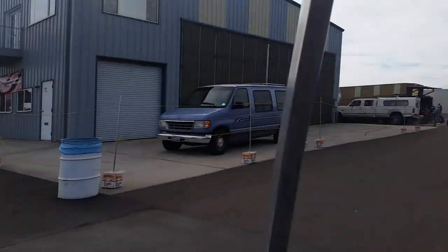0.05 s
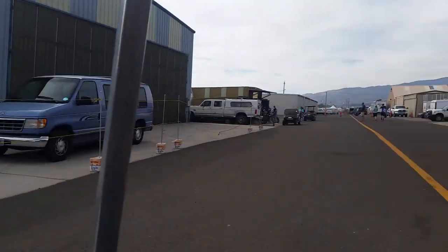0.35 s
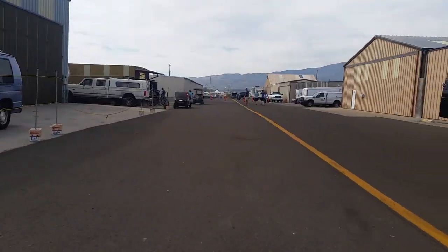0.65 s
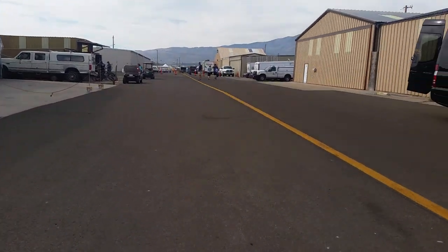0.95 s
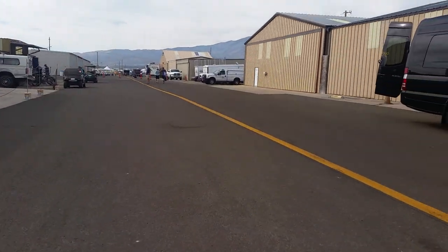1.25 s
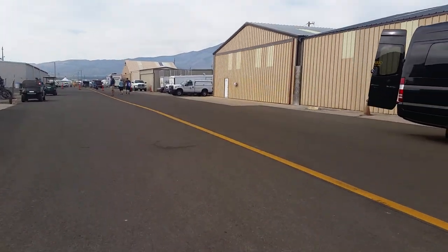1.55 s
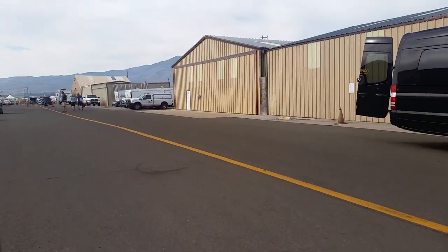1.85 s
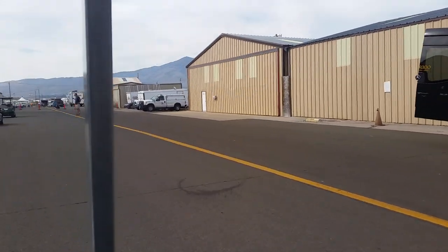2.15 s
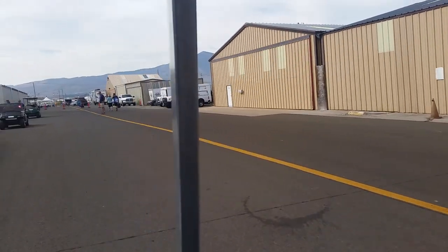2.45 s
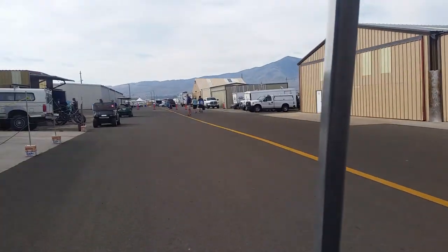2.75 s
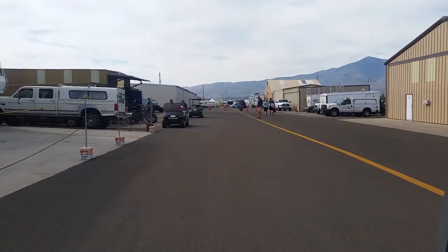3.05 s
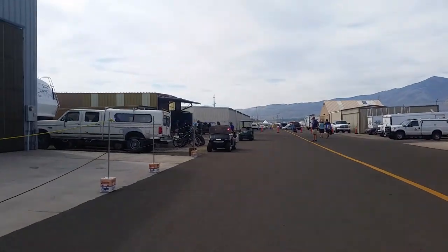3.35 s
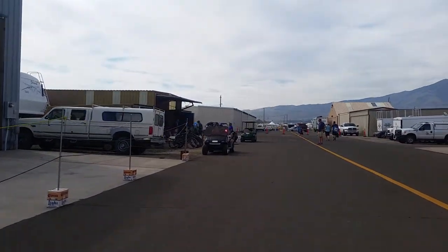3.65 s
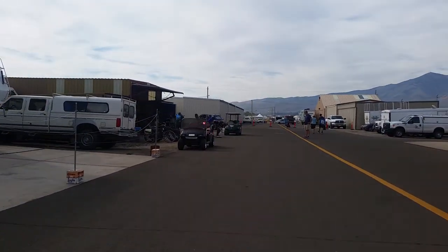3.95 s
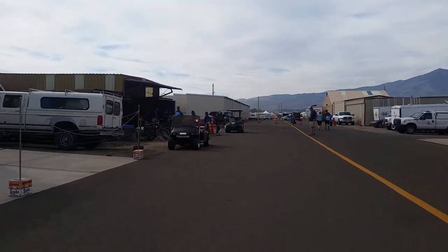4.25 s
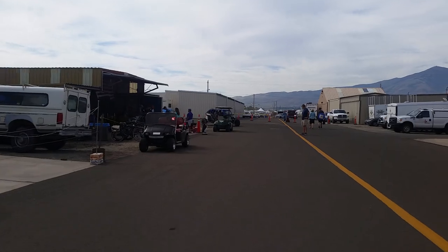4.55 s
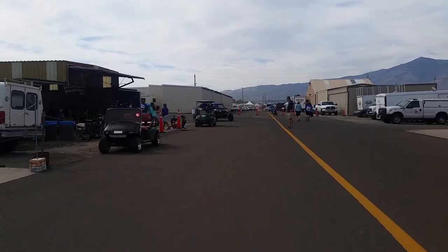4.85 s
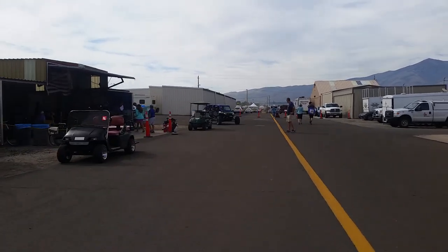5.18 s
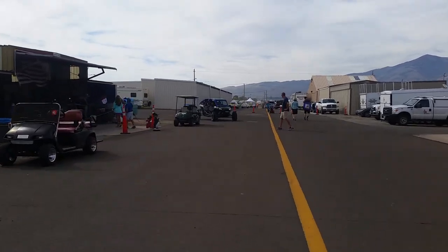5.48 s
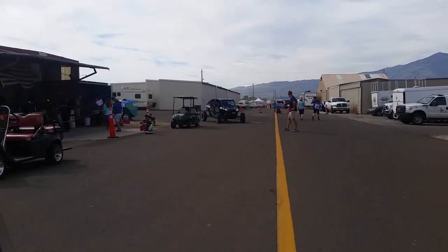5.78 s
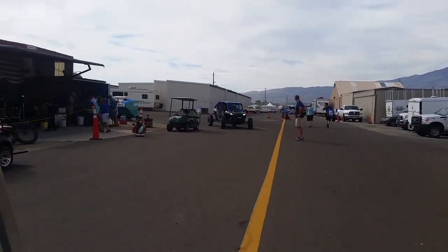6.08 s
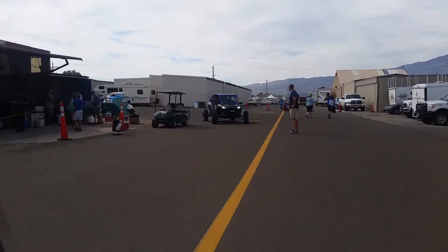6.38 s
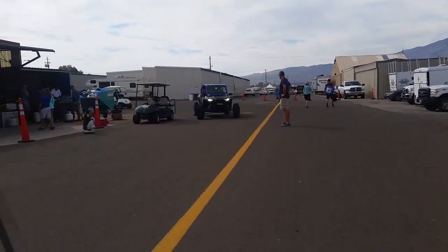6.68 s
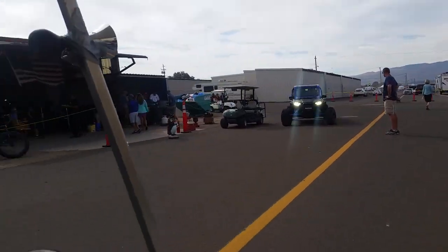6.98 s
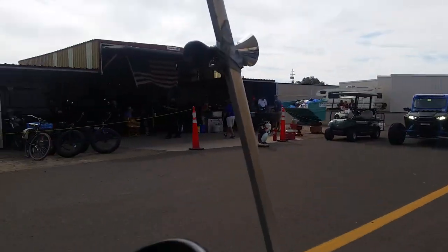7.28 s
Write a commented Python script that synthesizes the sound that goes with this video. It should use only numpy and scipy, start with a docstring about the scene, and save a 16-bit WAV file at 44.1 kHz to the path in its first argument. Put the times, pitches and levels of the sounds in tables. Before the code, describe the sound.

A petrol golf cart rolls along open pavement, heard from its seat. Its low drone beats against a second cart's engine over steady tyre roar, gear whine and buzzing, rattling fittings. Another engine revs briefly at the start, and a few bumps bring thuds and small squeaks. Wind buffets the microphone now and then. Near the end the whine grows louder and an oncoming buggy adds a low hum.

```python
"""On airfield pavement, heard from the open seat of a petrol golf cart while a second cart keeps pace.
Two single-cylinder engines sound harmonics of their firing rates, which beat against each other over
the boom of the body and the roar of the tyres. Meshing gears whine, grit excites the modes of the roof,
the frame squeaks and fittings rattle with each firing. A third engine revs at the start, and an
oncoming buggy adds its hum near the end."""
import sys
import numpy as np
from scipy import signal
from scipy.io import wavfile
from scipy.ndimage import uniform_filter1d, minimum_filter1d

SR = 44100
rng = np.random.default_rng(int(sys.argv[2]) if len(sys.argv) > 2 else 0)


def dump_mix(stems):
    """Bounce the given channels to the path in sys.argv[1] as a 16-bit WAV at rate SR."""
    frames = np.atleast_2d(stems).T  # one column per channel
    limited = np.clip(frames, -1, 1)  # hard clip at full scale
    pcm = np.round(limited * 32767).astype(np.int16)
    wavfile.write(sys.argv[1], SR, pcm)


N = 327222
TIME = np.arange(N) / SR


def from_db(db):
    """Amplitude ratio: a factor of ten for every 20 dB."""
    return 10 ** (np.asarray(db) / 20)

def rms_one(x):
    """Normalisation to unit mean power."""
    return x / np.sqrt(np.mean(x ** 2) + 1e-20)

def in_time(rows):
    """Linear interpolation in time, one curve for each column after the first."""
    times, *columns = np.transpose(rows)
    return [np.interp(TIME, times, column) for column in columns]

def at_hz(points, hz):
    """Interpolation on a logarithmic frequency axis."""
    frequencies, values = np.transpose(points)
    return np.interp(np.log(hz), np.log(frequencies), values)

def swell(t, half_s):
    """Gaussian envelope: 1 at time t, 1/e a half-length to either side."""
    return np.exp(-((TIME - t) / half_s) ** 2)

def turns(hz):
    """Phase in cycles is the integral of frequency, here from a random start."""
    return np.cumsum(hz) / SR + rng.random()

def drift(corner_hz):
    """Random modulation of rms 1: white noise smoothed by two equal poles."""
    step, settling = 40, 2000
    pole = np.exp(-2 * np.pi * corner_hz * step / SR)
    white = rng.standard_normal(N // step + settling + 2)
    slow = signal.lfilter([1], [1, -2 * pole, pole * pole], white)[settling:]
    return np.interp(np.arange(N) / step, np.arange(len(slow)), rms_one(slow))

def low_pass(x, hz):
    """Fourth-order roll-off, 24 dB per octave."""
    return signal.sosfilt(signal.butter(4, hz, fs=SR, output="sos"), x)

def resonate(x, modes):
    """Modal superposition: damped resonators in parallel, alternating in sign."""
    out = 0
    for k, (hz, width, db) in enumerate(modes):
        r = np.exp(-np.pi * width / SR)
        poles = [1, -2 * r * np.cos(2 * np.pi * hz / SR), r * r]
        mode = (1 - r * r) / 2 * signal.lfilter([1, 0, -1], poles, x + 1e-18)
        out += (-1) ** k * from_db(db) * mode
    return out

def wavering_tone(hz, wander, rough):
    """A sinusoid of rms 1 under random frequency and amplitude modulation."""
    amplitude = 1 + rough * drift(2.1)
    cycle = turns(hz * (1 + wander * drift(12.6)))
    return rms_one(amplitude * np.sin(2 * np.pi * cycle))

def narrow_noise(hz, spread_hz):
    """Narrow-band noise: two carriers in quadrature, each randomly modulated."""
    angle = 2 * np.pi * turns(hz)
    return drift(spread_hz) * np.cos(angle) + drift(spread_hz) * np.sin(angle)

def harmonics(cycle, orders, rough):
    """Periodic firing gives a harmonic series; unequal strokes modulate phase and amplitude."""
    out = 0
    for order, db in orders:
        angle = 2 * np.pi * (order * cycle + rng.random()) + rough * drift(4.4)
        out += np.sqrt(2) * from_db(db) * (1 + rough * drift(8.6)) * np.sin(angle)
    return out

def throb(cycle, firing, crank):
    """Amplitude modulation at the firing rate and at the crank rate, which is twice as high."""
    return rms_one(np.exp(firing * np.cos(2 * np.pi * cycle) + crank * np.cos(4 * np.pi * cycle)))

def impacts(per_s, spread_db):
    """Shot noise: two independent trains of impulses, random in time, size and sign."""
    struck = rng.random((2, N)) < per_s / SR
    return struck * from_db(spread_db * rng.random((2, N))) * rng.choice([-1, 1], (2, N))

def pan(x, lean_db):
    """A level difference places a sound to the left (positive) or right."""
    return x * from_db(np.array([[.5], [-.5]]) * lean_db)

def left_first(x, lag_s):
    """A path difference delays sound from the left on its way to the right channel."""
    return np.array([x, np.interp(np.arange(N) - lag_s * SR, np.arange(N), x)])

# Likeness of left and right in the noise field: f/Hz, correlation coefficient
CORRELATION = [(60, 0.75), (85, 0.43), (120, 0.64), (170, 1), (240, 0.58), (330, 0.62), (470, 0.73),
               (660, 0.7), (930, 0.29), (1310, -0.21), (1850, -0.36), (2600, 0.059)]
# Balance of the noise field: f/Hz, left minus right/dB
NOISE_LEAN = [(60, 9), (130, -1), (260, 4.5), (460, 0), (820, -1.5), (1400, -5.5), (2000, -4), (4000, -2.5),
              (6500, -5.5), (9000, 4), (12000, 7.5), (15000, -6.5)]
def at_ears(mid, side, hz):
    """Partial coherence: the sum and difference of independent signals form a stereo pair."""
    alike = at_hz(CORRELATION, hz)
    pair = np.sqrt(1 + alike) * mid + np.sqrt(1 - alike) * side * [[1], [-1]]
    return pan(pair, at_hz(NOISE_LEAN, hz))

def banded_noise(spectrum, flicker_db):
    """Broadband noise as a sum of roughly third-octave bands, each fluctuating independently."""
    bottom, top = spectrum[0][0], spectrum[-1][0]
    edges = np.geomspace(bottom, top, round(3 * np.log2(top / bottom)) + 2)
    out, white = 0, rng.standard_normal((2, 2, N))
    for k, (low, high) in enumerate(zip(edges, edges[1:])):
        band = signal.butter(2, [low, high], "band", fs=SR, output="sos")
        mid, side = signal.sosfilt(band, white[k % 2])
        hz = np.sqrt(low * high)
        out += from_db(at_hz(spectrum, hz) + flicker_db * drift(8.1)) * at_ears(mid, side, hz)
    out = low_pass(out, 1.15 * top)
    return out / np.std(out.mean(axis=0))

# Rush of air and tyres: t/s, relative hiss level/dB, relative level of the highest treble/dB
RUSH = [(0.0, -61, -68), (0.55, -63.5, -67), (0.92, -61, -64), (1.15, -64.5, -69.5), (1.56, -65, -69.5),
        (1.68, -68.5, -73), (1.95, -68.5, -76), (2.15, -70, -74.5), (2.3, -65, -72.5), (2.5, -68.5, -72.5),
        (2.8, -62, -66.5), (3.6, -60.5, -69), (3.8, -62.5, -73.5), (4.6, -64.5, -74.5),
        (5.15, -61.5, -71.5), (5.3, -64, -76), (5.92, -61, -75.5), (6.08, -71, -81), (6.55, -65, -77.5),
        (6.72, -61.5, -72), (7.05, -65, -74.5), (7.42, -60, -70)]
def ride_gain(db, rush_share=0, db_per_s=0):
    """Common modulation: a mean level, a share of the swing of the rush and a linear trend."""
    rush_db, _ = in_time(RUSH)
    return from_db(db + rush_share * (rush_db - rush_db.mean()) + db_per_s * (TIME - TIME.mean()))

# Spectra of the air's hiss and of its highest treble: f/Hz, relative density/dB
HISS_SPECTRUM = [(4600, 1.5), (5500, -2), (6400, -1.5), (7300, -5.5), (8200, -25)]
TREBLE_SPECTRUM = [(8000, -6.5), (9300, -8), (10500, -2), (12000, 3), (14000, -9), (16000, -1)]
def air_hiss(cycle):
    """Flow noise past the cab, modulated as the engine shakes it."""
    _, treble_db = in_time(RUSH)
    hiss = ride_gain(-67, rush_share=0.96, db_per_s=-0.45) * banded_noise(HISS_SPECTRUM, flicker_db=2)
    treble = from_db(treble_db + 2.5) * banded_noise(TREBLE_SPECTRUM, flicker_db=1)
    return (hiss + treble) * throb(cycle, firing=0.07, crank=0.09)

# Gusts on the left microphone: t/s, half-length/s, level/dB
GUSTS = [(1.258, 0.091, -18), (2.47, 0.067, -13.5), (2.66, 0.04, -16), (5.085, 0.025, -14.5),
         (6.18, 0.16, -18.5), (6.54, 0.022, -36), (6.906, 0.36, -31.5)]
# Cavity modes of its port: f/Hz, bandwidth/Hz, gain/dB
PORT_MODES = [(223, 200, 2), (367, 82, 8.5)]
def wind():
    """Turbulence buffets each microphone separately; gusts excite cavity resonance in the left port."""
    force = sum(from_db(db) * swell(t, half) for t, half, db in GUSTS)
    flutter = force * rms_one(low_pass(resonate(rng.standard_normal(N), PORT_MODES), hz=630))
    pressure = ride_gain(-36.5, db_per_s=-1.2) * from_db(2 * drift(2))
    buffet = pressure * rms_one(low_pass(rng.standard_normal((2, N)), hz=55))
    return flutter * [[1], [0]] + buffet

# Rough patches of pavement: t/s, half-length/s, thud level/dB, change in tyre and rattle level/dB
JOLTS = [(.3, .07, -28, 0), (0.953, 0.039, -20, 0.5), (1.008, 0.022, -24, 2.5), (1.1, 0.036, -19, -1),
         (1.261, 0.039, -15, 3), (1.56, .025, -38, 1.5), (2.79, 0.027, -43, 1), (3.45, 0.16, -41, 0.4),
         (3.847, 0.36, -29, 0.5), (5.047, 0.14, -38, 2.8)]
def jolt_gain():
    """Transient excitation: jolts briefly change the level of tyres, grit and fittings."""
    return from_db(sum(db * swell(t, half) for t, half, _, db in JOLTS))

# Spectrum of the chassis vibration: f/Hz, relative density/dB
RUMBLE_SPECTRUM = [(20, -17), (30, -6.5), (45, -4.5), (65, 0), (85, -6), (130, -20)]
def chassis_rumble():
    """Structure-borne road noise: steady shaking and the thuds of jolts add in power."""
    thud = sum(from_db(db) * swell(t, half) for t, half, db, _ in JOLTS)
    steady = ride_gain(-33.5, db_per_s=-0.68)
    return np.hypot(steady, thud) * banded_noise(RUMBLE_SPECTRUM, flicker_db=3.5)

# Spectra of the tyres' roar and the tread's hiss: f/Hz, relative density/dB
ROAR_SPECTRUM = [(150, -21.5), (250, 3.5), (320, -0.5), (390, -0.5), (500, -1), (620, -3.5), (760, -2),
                 (920, -4.5), (1150, -19), (1800, -40)]
TREAD_SPECTRUM = [(750, -24), (1050, 6), (1250, 1), (1650, 2.5), (2000, -18), (2600, -33)]
def tyres(cycle):
    """Rolling contact radiates broadband noise; its upper band throbs with the engine."""
    roar = ride_gain(-21.5, rush_share=0.27, db_per_s=0.13) * banded_noise(ROAR_SPECTRUM, -0.62)
    tread = ride_gain(-33, rush_share=0.52) * banded_noise(TREAD_SPECTRUM, flicker_db=1.36)
    return jolt_gain() * (roar + tread * throb(cycle, firing=0.081, crank=0.04))

# Modes of roof and windscreen: f/Hz, bandwidth/Hz, gain/dB
ROOF_MODES = [(370, 55, -3), (497.5, 25, 2.5), (563.5, 23, 4.5), (710, 20, 4.5), (740.5, 49, 0.5),
              (942, 150, -9.5), (1289, 59, -7.5), (1383, 30, -11), (1640, 24, -5.5), (1719, 25, -6),
              (1870, 35, -10), (1990, 77, -13.5)]
def roof():
    """Impact excitation: grit under the tyres rings modes that wax and wane as the panels flex."""
    grit = impacts(per_s=400, spread_db=9.5)
    ringing = 0
    for k, (hz, width, db) in enumerate(ROOF_MODES):
        mid, side = resonate(grit, [(hz, width, db)])
        ringing += (-1) ** k * from_db(drift(1.3)) * at_ears(mid, side, hz)
    ringing = low_pass(ringing, hz=2600)
    return jolt_gain() * ride_gain(-30, rush_share=0.23) * ringing / np.std(ringing.mean(axis=0))

# Chatter of the fittings: t/s, level/dB
CHATTER = [(0, -36), (.35, -36.5), (.6, -36), (.95, -37), (1.12, -38.5), (1.55, -38.5), (1.75, -39),
           (2.45, -39), (2.78, -35.5), (3.6, -37), (4.1, -36.5), (4.65, -36.5), (5.1, -37.5), (5.3, -37),
           (5.93, -37), (6.05, -40), (6.35, -39), (6.65, -38), (7.42, -37.5)]
# Spectrum of their buzz: f/Hz, relative density/dB
BUZZ_SPECTRUM = [(1400, -3), (1850, 6), (2300, 3), (2700, -4.5), (3200, -7.5), (3750, -7.5), (4500, -27),
                 (5300, -40.5)]
# Their modes: f/Hz, bandwidth/Hz, gain/dB
FITTING_MODES = [(1900, 500, -2), (2900, 900, 0), (3700, 900, 0), (4600, 900, -2)]
def rattles(cycle):
    """Intermittent contact: loose fittings buzz and strike, most often just as the engine fires."""
    buzz = banded_noise(BUZZ_SPECTRUM, flicker_db=0.96) * throb(cycle, firing=0.096, crank=0.047)
    contacts = impacts(per_s=130 * (1 + np.cos(2 * np.pi * cycle)), spread_db=1.5)
    ringing = rms_one(low_pass(resonate(contacts, FITTING_MODES), hz=4500))
    shaking = from_db(in_time(CHATTER)[0]) * jolt_gain()
    return shaking * (buzz + from_db(-18.5) * pan(ringing, lean_db=-2))

# Single strikes of a fitting: t/s, impulse level/dB
TICKS = [(1.3286, -12), (2.046, -1.5), (3.6184, -13), (5.153, -5)]
def ticks():
    """Impulse response: a bump strikes a fitting once, and its heavily damped modes die quickly."""
    strikes = np.zeros(N)
    for t, db in TICKS:
        strikes[round(t * SR)] = from_db(db)
    ringing = resonate(strikes, FITTING_MODES[1:])
    return pan(low_pass(low_pass(ringing, hz=4200), hz=4200), lean_db=-14)

# Chafing of loose parts: t/s, half-length/s, lower f/Hz, upper f/Hz, level/dB
SCUFFS = [(.338, .028, 2150, 2600, -35), (.93, .006, 5300, 6700, -55), (1.009, 0.016, 1350, 2750, -27.5),
          (1.18, .008, 2520, 3500, -47), (3.62, .025, 5000, 9000, -61), (5.186, .012, 4000, 6800, -53)]
def scuffs():
    """Sliding friction: on bumps, loose parts give short bursts of band-limited noise."""
    out = 0
    for t, half, low, high, db in SCUFFS:
        band = signal.butter(4, [low, high], "band", fs=SR, output="sos")
        out += from_db(db) * swell(t, half) * rms_one(signal.sosfilt(band, rng.standard_normal((2, N))))
    return pan(out, lean_db=-1.5)

# Squeaks of the frame's joints: t/s, half-length/s, f/Hz, glide/(Hz/s), level/dB
SQUEAKS = [(.735, .035, 505, 1400, -28), (.742, .02, 1570, 3500, -31), (.8, .015, 1285, 0, -31),
           (5.79, .016, 2040, 0, -36), (5.972, .04, 1390, 250, -31.5)]
def squeaks():
    """Frictional oscillation: flexing joints give nearly pure tones, most of them gliding upwards."""
    out = 0
    for t, half, hz, glide, db in SQUEAKS:
        pitch = hz + glide * np.clip(TIME - t, -2 * half, 2 * half)
        out += from_db(db) * swell(t, half) * np.sqrt(2) * np.sin(2 * np.pi * turns(pitch))
    return pan(out, lean_db=-3.5)

# Squeals of the drive: t/s, half-length/s, f/Hz, spread/Hz, level/dB
SQUEALS = [(.12, .14, 1860, 40, -38), (.31, .05, 1845, 40, -32.5), (.3, .22, 1620, 40, -38),
           (1, .57, 1858, 30, -39), (7.22, .2, 1615, 22, -37.5), (7.2, .22, 1740, 18, -40)]
def belt():
    """Bursts of narrow-band noise are heard as the rasp or squeal of a drive belt."""
    squeals = sum(from_db(db) * swell(t, half) * narrow_noise(np.full(N, hz), spread)
                  for t, half, hz, spread, db in SQUEALS)
    return pan(squeals, lean_db=-7.5)

# Gear whine, its pitch following road speed: t/s, f/Hz, level at f/dB, level at 1.5 f/dB
GEAR_WHINE = [(0, 718.8, -34, -49.5), (.45, 775, -36, -50), (.8, 781, -32, -50), (1.7, 770, -39, -61.5),
              (2.3, 775, -35.5, -55), (2.7, 780, -35, -57), (3.1, 795.8, -38.5, -48), (3.6, 868, -39, -37),
              (4.4, 890.4, -44, -39), (5.05, 921, -40.5, -38), (5.6, 930, -42.5, -42.5),
              (6.17, 915, -43, -51), (6.25, 913, -27.5, -54.5), (6.32, 913, -34, -54),
              (6.39, 915, -27.5, -53), (6.5, 910, -33, -51), (6.7, 900.4, -32, -48.5),
              (6.95, 887, -32.5, -43), (7.42, 868, -32, -42)]
# Rasp of the gears under load: t/s, level/dB
GEAR_RASP = [(0, -40), (.5, -27.5), (.8, -44), (1.7, -38.5), (2.3, -31.5), (3, -32.5), (3.5, -33),
             (4, -46.5), (7.42, -46.5)]
def gears():
    """Gear meshing gives a tone, modulated by the unsteady belt drive and broadened under load."""
    hz, whine_db, upper_db = in_time(GEAR_WHINE)
    tone = wavering_tone(hz, wander=0.008, rough=0.36)
    skirt = from_db(-6) * narrow_noise(hz, spread_hz=30)
    octave = from_db(-15) * narrow_noise(2 * hz, spread_hz=33)
    whine = from_db(whine_db) * (tone + skirt + octave)
    upper = from_db(upper_db) * narrow_noise(1.5 * hz, spread_hz=65)
    rasp = from_db(in_time(GEAR_RASP)[0]) * narrow_noise(1.035 * hz, spread_hz=53)
    return pan(left_first(whine + upper + rasp, lag_s=0.000087), lean_db=-2.5)

# Third engine: t/s, firing rate/Hz, fourth harmonic level/dB, fifth harmonic level/dB
THIRD_ENGINE = [(0, 26.6, -30, -18), (.25, 28.9, -17.5, -16.5), (.5, 31, -29.5, -19.5),
                (.8, 34.7, -15.5, -23.5), (1.05, 35.2, -21, -26), (1.35, 37.8, -23, -26),
                (1.6, 41, -24, -39), (1.9, 44, -56, -63)]
def third_engine():
    """Harmonics rise in proportion to the firing rate as an engine revs and is left behind."""
    firing_hz, fourth_db, fifth_db = in_time(THIRD_ENGINE)
    cycle = turns(firing_hz)
    fourth = from_db(fourth_db) * harmonics(cycle, [(4, 0)], rough=0.15)
    fifth = from_db(fifth_db) * harmonics(cycle, [(5, 0)], rough=0.15)
    return pan(left_first(fourth + fifth, lag_s=0.00057), lean_db=-1)

# Hum of the oncoming buggy: t/s, f/Hz, level/dB
BUGGY_HUM = [(0, 124, -70), (5.1, 124, -46), (5.45, 123, -23), (5.7, 120, -27), (5.9, 116, -23.5),
             (6.5, 114.5, -26.5), (7, 114, -18.5), (7.42, 115, -18.5)]
def buggy():
    """A single modulated partial grows louder as its source approaches."""
    hz, db = in_time(BUGGY_HUM)
    return from_db(db) * wavering_tone(hz, wander=0.0034, rough=0.29)

# Drone of the two carts: t/s, relative level/dB
DRONE_LEVEL = [(0.0, -14), (0.85, -14.5), (1.4, -14), (1.85, -15.5), (2.2, -16), (2.65, -16), (2.85, -22.5),
               (3.45, -16), (4.15, -15.5), (4.35, -16), (4.6, -13), (4.76, -17), (4.95, -10.5),
               (5.3, -12.5), (7.42, -15.5)]
EXHAUST_DB, BOOM_DB = 1.37, -3.5  # exhausts and body boom, relative to the drone
def drone_gain(offset_db):
    """Gains add in decibels: exhausts and body boom share one envelope, each with its offset."""
    return from_db(in_time(DRONE_LEVEL)[0] + offset_db)

# Spectrum of the body's boom: f/Hz, relative density/dB
BOOM_SPECTRUM = [(55, -31), (80, -6), (100, -3.5), (135, -2.5), (175, -6), (220, -10), (290, -33.5),
                 (450, -31.5)]
# Brief hums of the body: t/s, half-length/s, f/Hz, level/dB
BODY_HUMS = [(1.15, .3, 378, -32), (2.302, .18, 156.4, -25.5), (2.55, 0.15, 357, -33),
             (2.953, 0.27, 227, -28.5), (3.194, 0.24, 159.2, -23), (3.8, 0.11, 160, -23.5),
             (5.42, 0.053, 745, -28)]
def body():
    """Resonance: the body booms with the drone, and now and then one part is shaken into a hum."""
    boom = drone_gain(BOOM_DB) * banded_noise(BOOM_SPECTRUM, flicker_db=0.4)
    hums = sum(from_db(db) * swell(t, half) * wavering_tone(hz, wander=0.0051, rough=0.074)
               for t, half, hz, db in BODY_HUMS)
    return boom + pan(hums, lean_db=-1)

# Modes of the body panels: f/Hz, bandwidth/Hz, gain/dB
PANEL_MODES = [(414, 75, -12.5), (531, 120, 1.5), (730, 74, -1), (1290, 150, -7), (1795, 47, -18)]
# Engine harmonics that they pick out: order, relative level/dB
PANEL_ORDERS = [(14, -8), (16, -5), (17, -4.5), (18, -4), (25, -14.5), (30, -10.5), (34, -7), (35, -11.5)]
# Strength of their shaking: t/s, level/dB
PANEL_SHAKE = [(0, -28), (.8, -32), (1.8, -37), (2.7, -33), (3.4, -32.5), (5, -32), (6, -33), (7.42, -43)]
def panels(cycle):
    """Forced vibration: panels hum with the engine and ring to blows of firing, piston and valves."""
    hum = harmonics(cycle, PANEL_ORDERS, rough=0.49)
    blows = np.zeros(N)
    for point in rng.random(6):  # six blows, at the same points of every cycle
        count = np.floor(cycle + point)
        blows += np.diff(count, prepend=count[0]) * rng.choice([-1, 1])
    ringing = rms_one(resonate(blows * from_db(4 * drift(10)), PANEL_MODES))
    knock = from_db(-0.5) * low_pass(ringing, hz=2560)
    return from_db(in_time(PANEL_SHAKE)[0]) * pan(hum + knock, lean_db=-4.5)

# Shares of the drone: t/s, ridden cart/dB, second cart/dB, second cart's sixth harmonic/dB
EXHAUST_SHARES = [(0, -10.5, -22.5, -23.5), (1.3, -8, -13, -21), (1.8, -9.5, -20, -24),
                  (2.25, -9, -16.5, -5), (2.6, -6, -9, -3), (2.95, -3, -4, -8.5), (3.5, -4, -9.5, -7.5),
                  (4.15, -5, -8, -13), (4.6, -5.5, -11, -7.5), (5, -11.5, -13, -13), (5.6, -8, -15.5, -13),
                  (6, -17.5, -9, -3.5), (6.3, -7, -6.5, -7.5), (6.55, -15.5, -13, -1.5), (6.9, -11, -6, -4),
                  (7.42, -11, -15.5, 0)]
# Engine speed of the second cart: t/s, firing rate/Hz
SECOND_FIRING = [(0, 20), (1.9, 20.2), (2.25, 21), (2.55, 21.5), (3.1, 22.7), (3.6, 23.2), (4.2, 23.9),
                 (4.8, 24.15), (5.2, 24), (5.6, 24.45), (6.1, 23.95), (6.55, 23.8), (7.42, 23.2)]
# Its exhaust spectrum: order, relative level/dB
SECOND_ORDERS = [(2, -29), (4, -5.5), (5, -24.5), (7, -10.5), (8, -2.5), (11, -20), (16, -29), (18, -14)]
def second_exhaust():
    """Beats arise as these harmonics lie close in frequency to those of the ridden cart."""
    _, share_db, sixth_db = in_time(EXHAUST_SHARES)
    cycle = turns(in_time(SECOND_FIRING)[0])
    series = drone_gain(EXHAUST_DB + share_db) * harmonics(cycle, SECOND_ORDERS, rough=0.12)
    sixth = drone_gain(EXHAUST_DB + sixth_db) * harmonics(cycle, [(6, 0)], rough=0.06)
    return series + sixth

# Exhaust spectrum of the ridden cart: order, relative level/dB
RIDDEN_ORDERS = [(2, -17), (3, -18), (4, -10), (5, -7), (6, 0), (7, -11.5), (8, -10.5), (10, -17),
                 (11, -20)]
def ridden_exhaust(cycle):
    """The periodic pulses of one cylinder radiate a harmonic series, strongest at the sixth order."""
    share_db = in_time(EXHAUST_SHARES)[0]
    return drone_gain(EXHAUST_DB + share_db) * harmonics(cycle, RIDDEN_ORDERS, rough=0.22)

# Engine speed of the ridden cart, governed in mid-run: t/s, firing rate/Hz
RIDDEN_FIRING = [(0, 21.3), (.4, 21.4), (.9, 21.86), (1.8, 22.44), (2.6, 22.78), (5.1, 22.73), (5.9, 22.8),
                 (6.25, 22), (6.6, 21.78), (7, 21.35), (7.42, 21.25)]
# Balance of the drone: t/s, left minus right/dB
DRONE_LEAN = [(0, -1), (1.3, 3.5), (2.6, -3), (3.6, 1.5), (5.2, 4.5), (6.2, 4), (7.42, 0)]
def scene():
    """Superposition in a free field: all sources add at the open seat, without reverberation."""
    cycle = turns(in_time(RIDDEN_FIRING)[0])
    background = air_hiss(cycle) + wind() + chassis_rumble() + tyres(cycle) + roof()
    loose_parts = rattles(cycle) + ticks() + scuffs() + squeaks()
    machinery = belt() + gears() + third_engine() + body() + panels(cycle)
    drone = left_first(buggy() + second_exhaust() + ridden_exhaust(cycle), lag_s=0.00082)
    return background + loose_parts + machinery + pan(drone, in_time(DRONE_LEAN)[0])

def record(dry):
    """Band and peak limiting: deepest bass and top are cut, and a smooth gain holds down the peaks."""
    x = signal.sosfilt(signal.butter(2, 22, "high", fs=SR, output="sos"), dry)
    headroom = np.minimum(1, .93 / (np.abs(x).max(axis=0) + 1e-9))
    gain = uniform_filter1d(minimum_filter1d(headroom, size=801), size=801)
    treble_cut = signal.ellip(10, .1, 80, 15760, fs=SR, output="sos")
    return signal.sosfilt(treble_cut, x * gain)


dry = scene()
out = record(dry)
dump_mix(out)
```